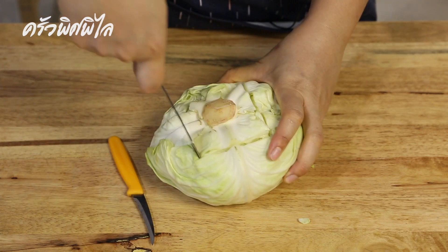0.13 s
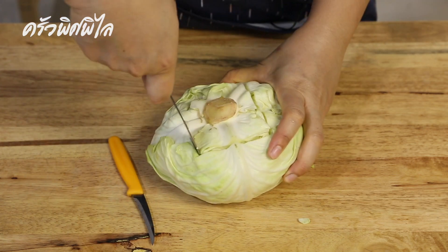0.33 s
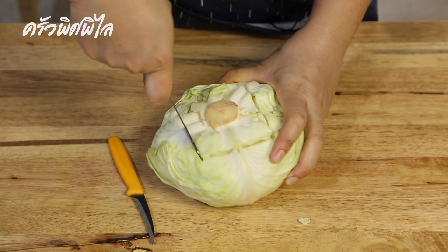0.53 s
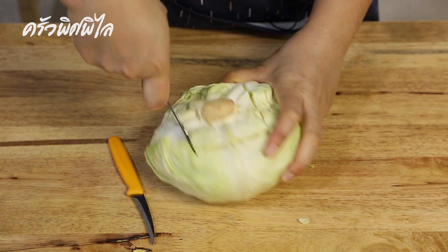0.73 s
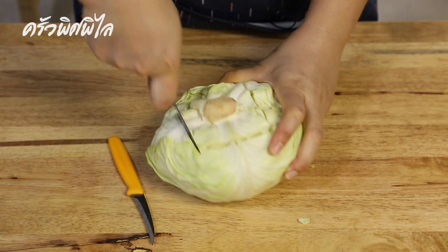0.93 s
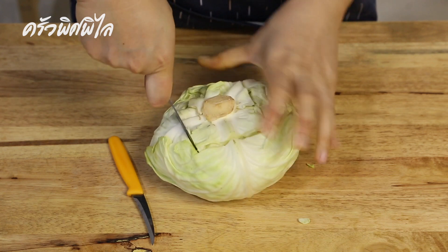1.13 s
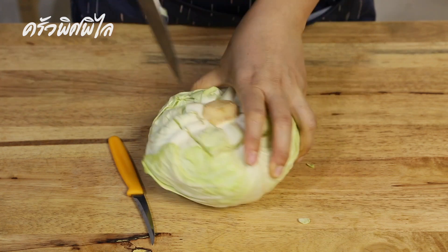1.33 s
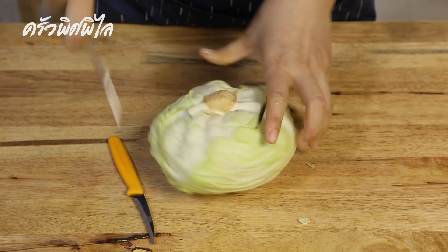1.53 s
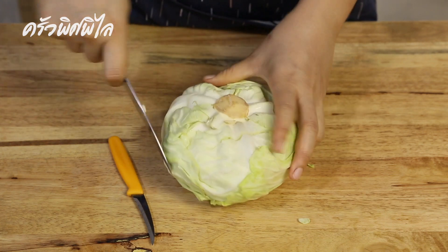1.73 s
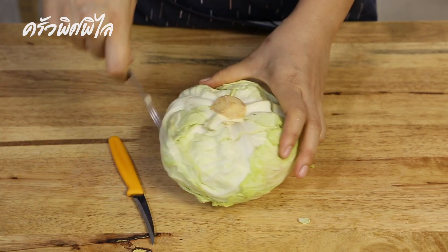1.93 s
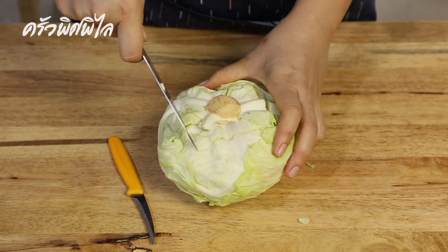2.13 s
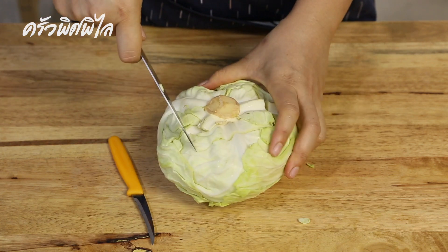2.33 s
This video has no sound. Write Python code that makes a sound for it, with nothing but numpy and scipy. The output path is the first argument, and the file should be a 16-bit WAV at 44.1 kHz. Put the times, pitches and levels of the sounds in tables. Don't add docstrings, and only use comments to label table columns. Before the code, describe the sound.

Crisp cabbage cutting on a wooden board: wet-crisp crackles, sharp rib snaps, a cut, a soft rustle

```python
import sys
import numpy as np
from scipy import signal
from scipy.fft import rfft, irfft, next_fast_len
from scipy.io import wavfile
from scipy.ndimage import uniform_filter1d

SR = 44100
rng = np.random.default_rng(int(sys.argv[2]) if len(sys.argv) > 2 else 0)


def boost(x):
    u = np.asarray(x, float) / 20
    return 10 ** u


def unload_audio(sound):
    columns = np.transpose(np.atleast_2d(sound))
    steps = np.round(np.clip(columns, -1, 1) * 32767)
    wavfile.write(sys.argv[1], SR, steps.astype(np.int16))


N = 105840
CUT_S = 1.369


def unit(x):
    return x / np.sqrt(np.mean(x ** 2) + 1e-20)


def high_pass(x, order, hz):
    return signal.sosfilt(signal.butter(order, hz, "high", fs=SR, output="sos"), x)


def drift(rate_hz):
    settle = 9000
    r = np.exp(-2 * np.pi * rate_hz / SR)
    noise = rng.standard_normal(N + settle)
    return unit(signal.lfilter([1], [1, -2 * r, r * r], noise)[settle:])


def resonance(x, hz, width_hz):
    r = np.exp(-np.pi * max(width_hz, 4) / SR)
    poles = [1, -2 * r * np.cos(2 * np.pi * hz / SR), r * r]
    return signal.lfilter([(1 - r * r) / 2, 0, (r * r - 1) / 2], poles, x + 1e-18)


def coloured(spectrum, patchy_db):
    out = 0
    edges = 35 * 2 ** np.arange(0, 9.1, .5)
    white = rng.standard_normal((2, N))
    hz, db = np.transpose(spectrum)
    for k, (low, high) in enumerate(zip(edges, edges[1:])):
        band_pass = signal.butter(2, [low, high], "band", fs=SR, output="sos")
        band = signal.sosfilt(band_pass, white[k % 2])
        level_db = np.interp(np.log(low * high) / 2, np.log(hz), db)
        flicker_db = patchy_db * drift(12.8) * (low < 1500)
        out = out + band * boost(level_db + flicker_db)
    return unit(out)


# frequency in Hz, level in dB per Hz.
TONE = [(24, -64), (40, -29), (342, -4.5), (369, -3), (462, -7), (781, -1.5), (841, -9.5), (7960, -20),
        (15600, -34)]
# frequency in Hz, level in dB per Hz.
HISS = [(24, -49), (40, -17), (218, -5), (318, -7), (537, -7), (1110, -13), (6200, -8), (15600, -11.5)]
# frequency in Hz, width in Hz, level in dB.
HUMS = [(510, 4.7, -62), (794, 4.4, -63), (384.4, 9, -64)]


def room_tone():
    hiss_db = -59.5
    mid = boost(-51) * coloured(TONE, patchy_db=1.4)
    mid = mid + boost(hiss_db - 7) * coloured(HISS, patchy_db=5.5)
    for hz, width_hz, db in HUMS:
        mid = mid + boost(db) * unit(resonance(rng.standard_normal(N), hz, width_hz))
    side = boost(hiss_db) * coloured(HISS, patchy_db=3.5)
    return np.array([mid, side])


# start in seconds, length in seconds, level in dB,
# change over the stroke in dB, brightness in dB.
STROKES = [(0, 0.087, -55.5, -10, 10.5), (0.18, .055, -49, 5, 2), (0.229, 0.035, -32, -1, 7),
           (0.267, .016, -32, -10.5, 6), (0.39, 0.06, -23, 0, 2), (0.564, 0.069, -26, -5, -6),
           (0.678, 0.076, -24.5, -0.5, -1.5), (0.758, 0.074, -40.5, -4, 0), (0.848, 0.026, -33.5, 8, -13),
           (0.878, 0.063, -29.5, 1, -3), (1.022, .048, -33.5, 4.5, -12), (1.188, 0.075, -46.5, -6.5, 0.5)]


def crackle():
    t = np.arange(N) / SR
    attack_s, release_s = 0.0018, 0.003
    push = np.zeros((3, N))
    for start, length, db, change_db, bright_db in STROKES:
        rise = np.clip((t - start) / attack_s, 0, 1)
        fall = np.exp(-np.clip(t - start - length, 0, 1) / release_s)
        progress = np.clip((t - start) / length, 0, 1)
        level = rise * fall * boost(db + change_db * (progress - .5))
        push = push + level * boost([[0], [0.63 * bright_db], [bright_db]])

    spread_db = 2.5 * np.minimum(rng.exponential(1, (2, N)), 4)
    sizes = boost(spread_db) * rng.choice([-1, 1], (2, N))
    clumps = boost(2.5 * drift(134))
    coarse = unit(sizes[0] * clumps * (rng.random(N) < 4000 / SR))
    fine = unit(sizes[1] * (rng.random(N) < 9000 / SR))
    fine_share = 0.54
    mixed = (1 - fine_share) * coarse + fine_share * fine
    return push * [coarse, mixed, mixed]


# frequency in Hz, width in Hz, level in dB.
HEAD_LOW = [(478, 72, -6.5), (580, 165, -1.5), (837, 278, 1), (1150, 273, 0), (1540, 660, -3)]
HEAD_HIGH = [(2214, 410, -9.5), (2705, 310, -3.5), (3253, 290, -11)]
HEAD_TOP = [(4620, 520, -16.5), (6400, 1700, -16), (7700, 1500, -23.5), (9400, 1300, -22)]


def head(cracks, ribs):
    out = 0
    for crack, rib, modes in zip(cracks, ribs, (HEAD_LOW, HEAD_HIGH, HEAD_TOP)):
        for k, (hz, width_hz, db) in enumerate(modes):
            patches = boost(2 * drift(55))
            clicks = crack * patches * rng.uniform(0.068, 1.87, N)
            clicks = clicks + rib * (1 + 0.33 * rng.uniform(-1.67, 1, N))
            evened = np.sqrt(SR / 20 / max(width_hz, 4))
            out = out + (-1) ** k * boost(db) * resonance(clicks, hz, width_hz) * evened
    out = high_pass(out, 3, 425)
    return signal.sosfilt(signal.cheby2(10, 40, 10220 * 1.056, fs=SR, output="sos"), out)


def kitchen(x):
    t60_s, wall_cut_hz = 0.52, 11600
    size = next_fast_len(N + SR)
    z = np.exp(-2j * np.pi * np.arange(size // 2 + 1) / size)
    dull = np.exp(-2 * np.pi * wall_cut_hz / SR)
    wall = (1 - dull) / (1 - dull * z)
    spectrum = rfft(x, size)
    out = []
    for lags in (rng.uniform(.011, .043, (2, 12)) * SR).astype(int):
        h = 0
        for k, lag in enumerate(lags[:10]):
            loop = boost(-60 * lag / SR / t60_s) * wall * z ** lag
            h = h + (-1) ** k * loop / (1 - loop) / 3
        for lag in lags[10:] // 8:
            h = h * (z ** lag - .6) / (1 - 0.68 * z ** lag)
        out.append(irfft(spectrum * h, size)[:N])
    return out


# time in seconds, peak level in dB, 2-4 kHz level in dB, top level in dB.
SNAPS = [(0.174, -36, 10, 3), (0.193, -34, 1, -2), (0.212, -34, 0, -8), (0.231, -25.5, -3, 4),
         (0.392, -22, 10, -14), (0.439, -23, 6, -3), (0.527, -21.5, 3, 0.5), (0.548, -22.5, 5, 3),
         (0.568, -16, -0.5, -16), (0.576, -15, -1, -12), (0.583, -10, 1.5, -11), (0.595, -9, 1.5, 1.5),
         (0.609, -17.5, -0.5, 0), (0.625, -23, -1, -8), (0.68, -9, 3.5, 6), (0.713, -20.5, -2, 10),
         (0.739, -19, 10, -2), (0.785, -21.5, 2, -12), (0.852, -27.5, -7, -13), (0.877, -20, -3, -10),
         (0.916, -16, -6, 5), (0.924, -18, -3, -2), (1.027, -23.5, -3, -18), (1.038, -22.5, -3, -15),
         (1.052, -20.5, -1, -8), (1.226, -31.5, 1, 2), (1.871, -27.5, 1.5, -0.5)]


def snaps():
    out = np.zeros((3, N))
    run = np.arange(6)
    split_s = .0006
    for start, db, high_db, top_db in SNAPS:
        gaps = rng.uniform(.5, 1.5, len(run))
        at = ((start + split_s * (np.cumsum(gaps) - gaps[0])) * SR).astype(int)
        level_db = db - 5.5 + np.array([[0], [high_db], [top_db]])
        loss_db = 3.5 * abs(run - 1)
        out[:, at] += boost(level_db - loss_db) * 10 * (-1.) ** run
    return out


# time in seconds, level in dB.
PUSHES = [(0.273, -45), (0.393, -32), (.44, -39), (0.551, -34), (.57, -28.5), (0.611, -35), (.682, -31),
          (0.739, -41.5), (0.899, -48), (1.032, -41.5), (1.229, -45), (1.546, -43), (1.87, -42.5)]
# frequency in Hz, level in dB, 60 dB decay time in seconds.
BOARD = [(169.5, -9.5, 0.04), (242, -7.5, 0.058), (348.6, -4.5, 0.047), (410, -3.5, 0.039)]


def board(crackle):
    out = np.zeros(N)
    start, db = np.transpose(PUSHES)
    for hz, level_db, t60 in BOARD:
        clicks = boost(level_db - 40.5) * crackle
        clicks[(start * SR).astype(int)] += boost(db + level_db + rng.normal(0, 1.77, len(start)))
        r = boost(-60 / (max(t60, .01) * SR))
        w = 2 * np.pi * hz / SR
        out += signal.lfilter([0, np.sin(w)], [1, -2 * r * np.cos(w), r * r], clicks + 1e-18)
    return high_pass(out, 4, 154)


# start in seconds, frequency in Hz, level in dB, swell in seconds.
BOOMS = [
    (.41, 97.5, -57, 0.077),
    (.58, 99.5, -50.5, 0.024),
    (0.691, 97.2, -49, 0.04),
    (0.599, 128.2, -51, 0.067),
    (0.858, 126.5, -56.5, 0.045),
    (1.029, 120, -66, 0.031),
]


def counter():
    out, t = np.zeros(N), np.arange(N) / SR
    for start, hz, db, swell in BOOMS:
        age = np.clip(t - start, 0, 9) / swell
        envelope = np.e * age * np.exp(-age)
        phase = 2 * np.pi * hz * (t - start) + 1.3 * drift(8.4)
        out += boost(db + 4 * drift(14)) * envelope * np.sin(phase)
    return out


# frequency in Hz, level in dB per Hz.
RUSTLE = [(88, -54), (150, -25), (495, -2.5), (883, -5.5), (1130, 0), (1730, -10.5), (5950, -23.5),
          (15000, -59)]


def turning():
    rise_s, hold_s, fall_s, tail_s = 0.0078, 0.035, 0.028, 0.15
    age = np.arange(N) / SR - 1.535
    after = np.clip(age - rise_s - hold_s, 0, 9)
    decay = np.exp(-after / fall_s) + boost(-5.5) * np.exp(-after / tail_s)
    shape = np.clip(age / rise_s, 0, 1) ** 2 * decay
    grain = boost(-40 + 1.5 * drift(200))
    return grain * shape * coloured(RUSTLE, patchy_db=1.4)


def sinking(floor, near):
    t = np.arange(N) / SR
    loud_db = 10 * np.log10(uniform_filter1d(near ** 2, size=900) + 1e-12)
    over_db = 0.39 * np.clip(loud_db + 30.5, 0, 60)
    recovery_db = 4.5 * t
    duck_db = recovery_db - np.maximum.accumulate(over_db + recovery_db)
    before_db = np.where(t < CUT_S + .01, [[-3], [-6]], 0)
    floor = floor * boost(duck_db) * boost(before_db)
    treble = signal.sosfiltfilt(signal.butter(8, 10400, "high", fs=SR, output="sos"), floor)
    treble_loss_db = 1.9 * np.clip(loud_db + duck_db + 28, 0, 60)
    return floor - treble * (1 - boost(-treble_loss_db))


def scene():
    cracks = crackle()
    near = head(cracks, snaps()) + board(cracks[0]) + counter() + turning()
    tail, tail_side = kitchen(near)
    floor = sinking(room_tone(), near)
    room_db = -11
    mid = near + boost(room_db) * tail + floor[0]
    side = boost(room_db - 40.5) * tail_side + floor[1]
    return np.array([mid + side, mid - side])


def roll_off(x):
    return signal.sosfilt(signal.butter(12, 15770, fs=SR, output="sos"), x)


def record(dry):
    t = np.arange(N) / SR
    fall_s, fade_s = 0.00083, 0.077
    stop = np.clip((CUT_S + fall_s - t) / fall_s, 0, 1)
    fade_in = (1 - np.exp(-np.clip(t - CUT_S, 0, 9) / fade_s)) ** 1.38
    heard = high_pass(dry, 4, 83)
    heard = signal.sosfilt(signal.cheby2(16, 60, 15760 * 1.014, fs=SR, output="sos"), heard)
    return roll_off(heard * (stop + fade_in))


dry = scene()
out = record(dry)
unload_audio(out)
```